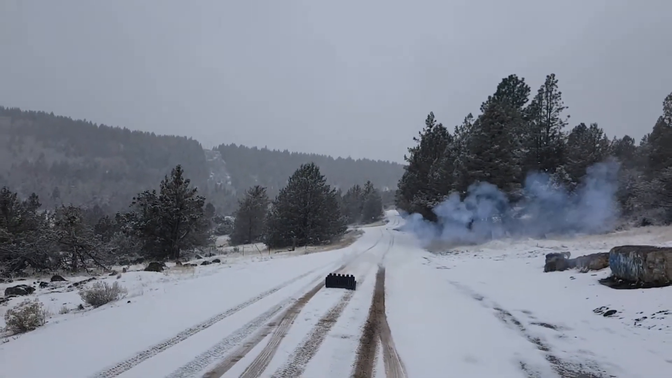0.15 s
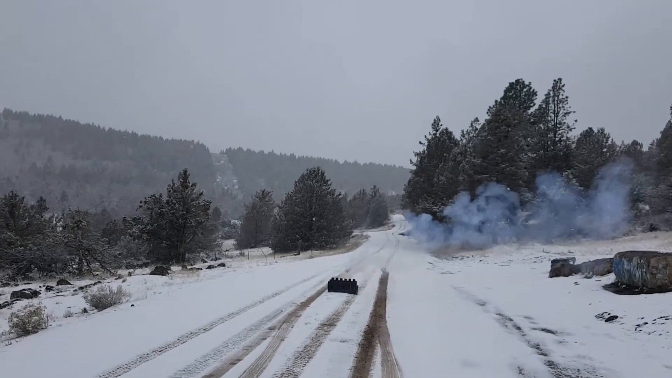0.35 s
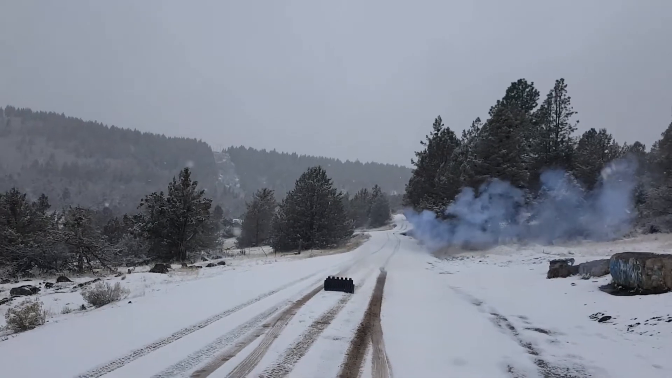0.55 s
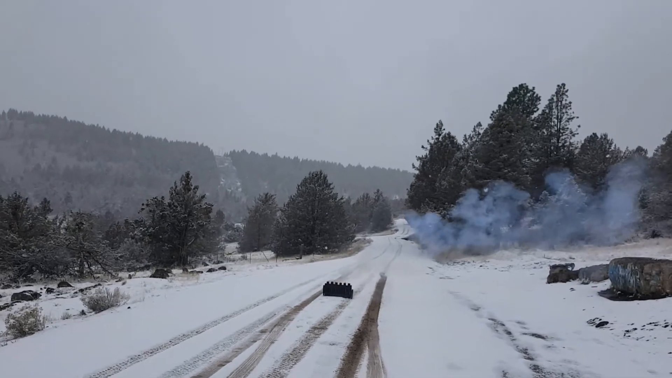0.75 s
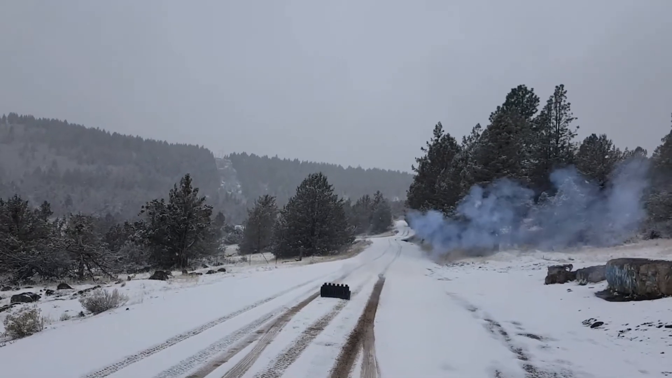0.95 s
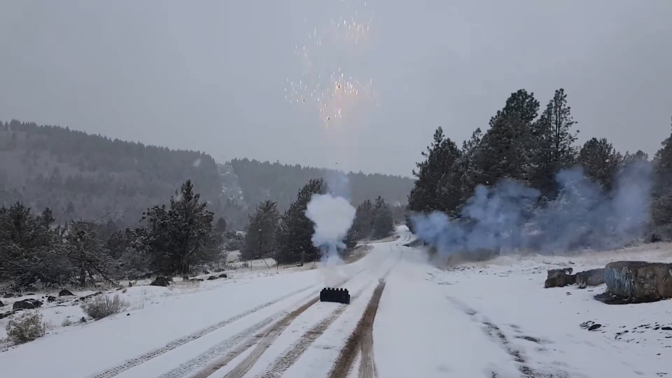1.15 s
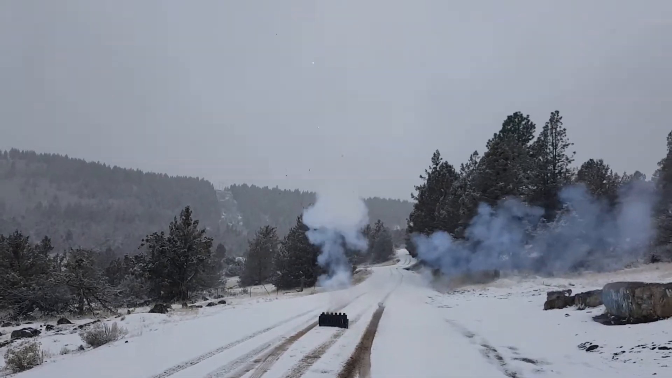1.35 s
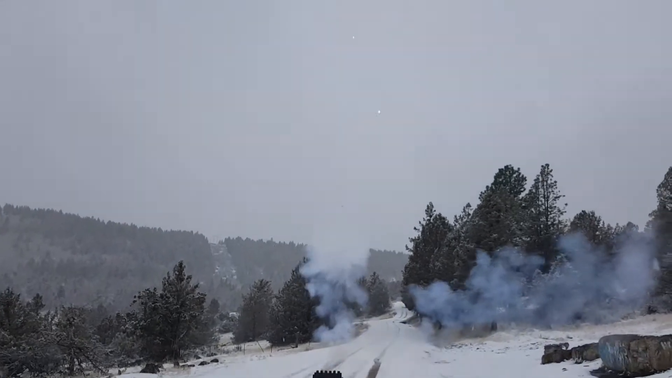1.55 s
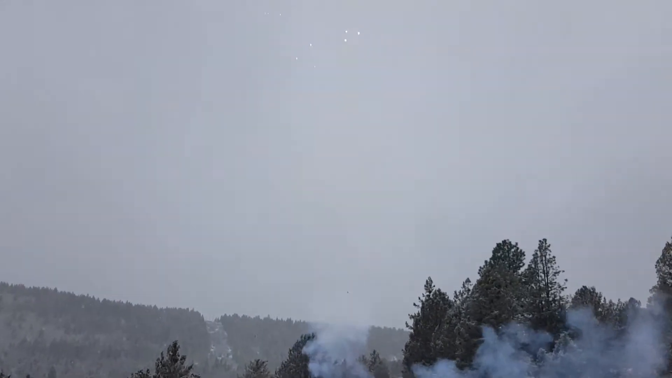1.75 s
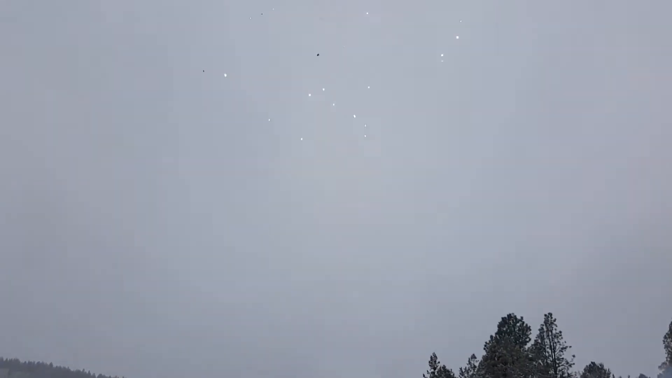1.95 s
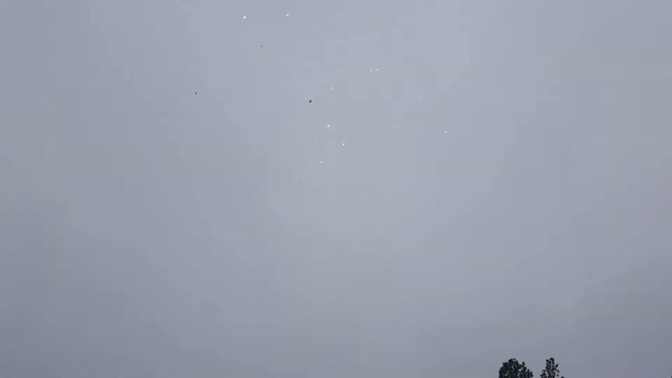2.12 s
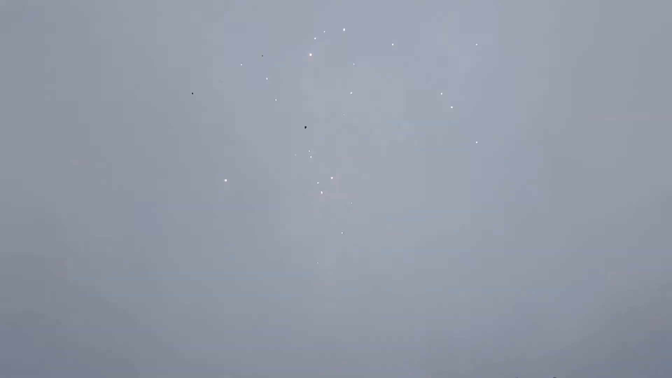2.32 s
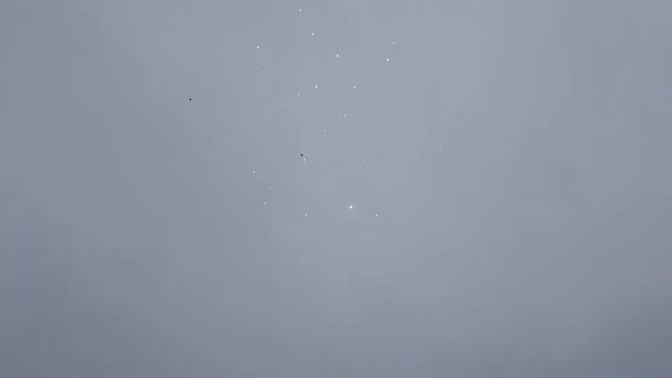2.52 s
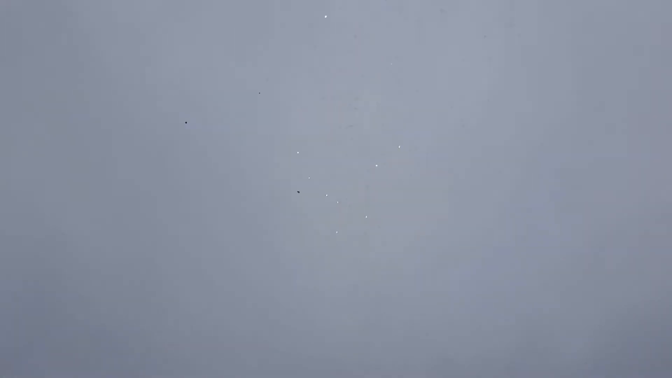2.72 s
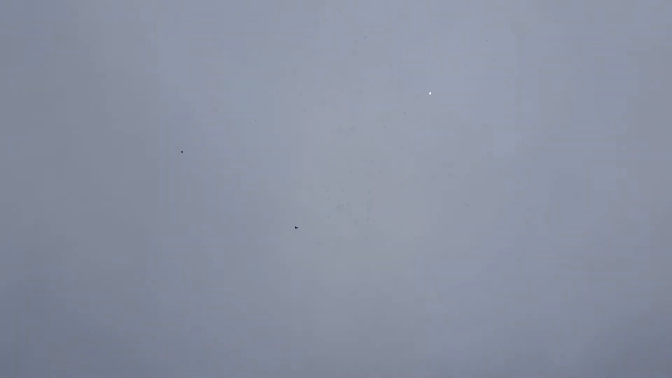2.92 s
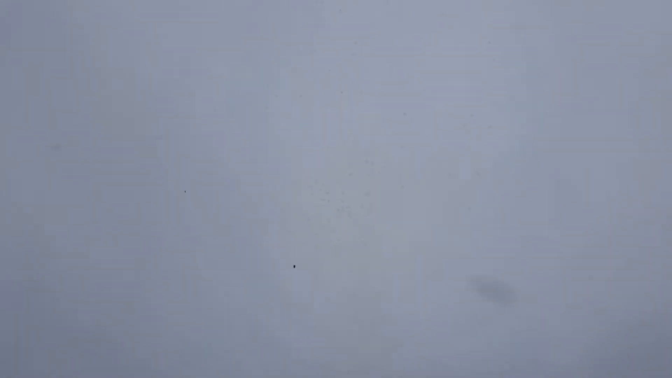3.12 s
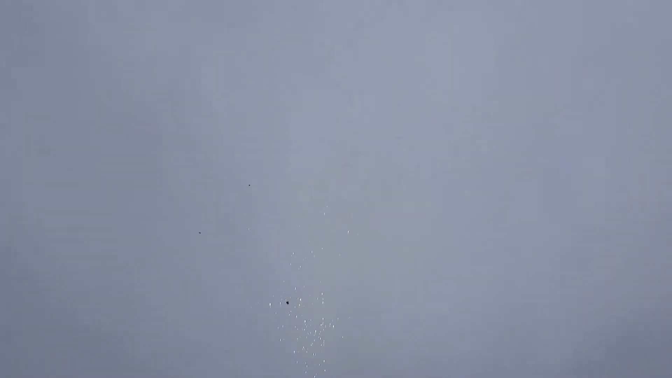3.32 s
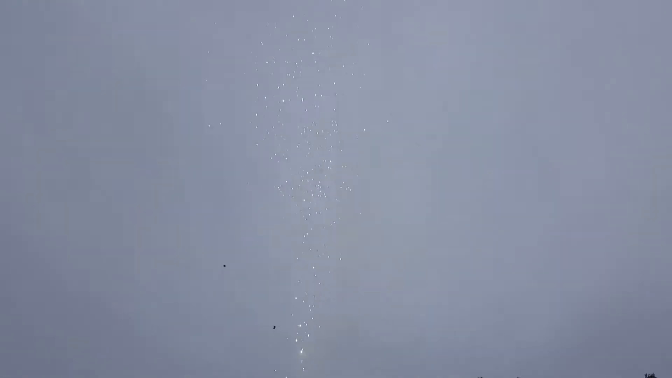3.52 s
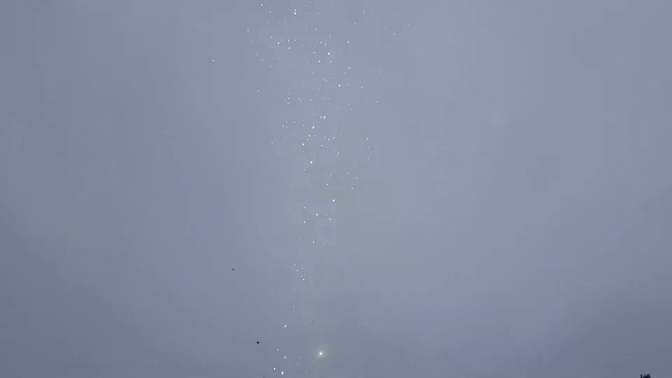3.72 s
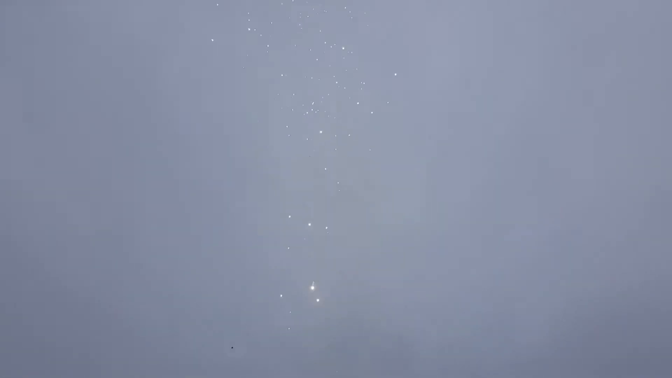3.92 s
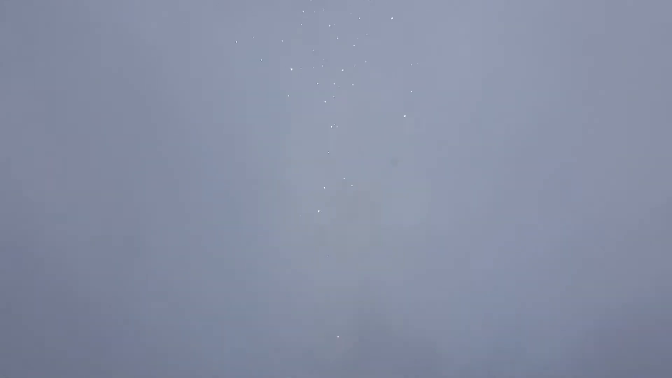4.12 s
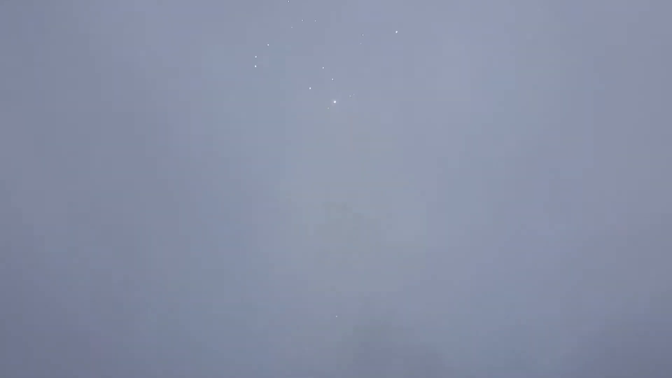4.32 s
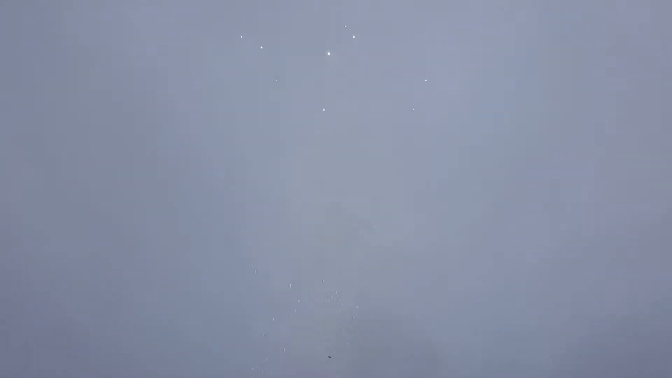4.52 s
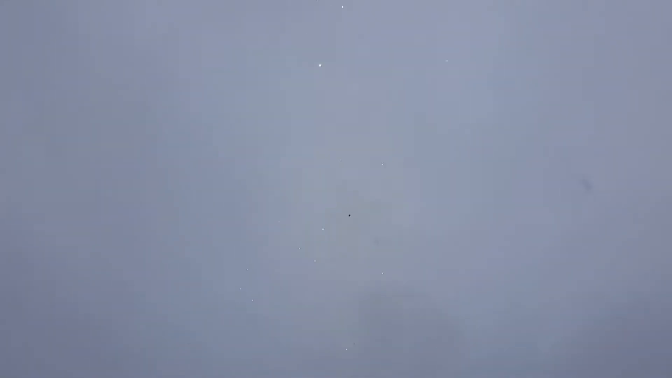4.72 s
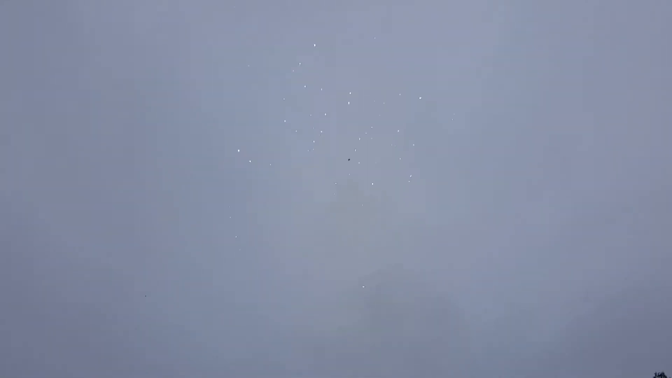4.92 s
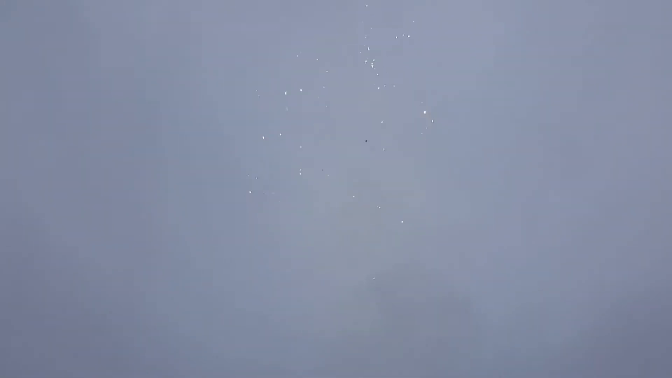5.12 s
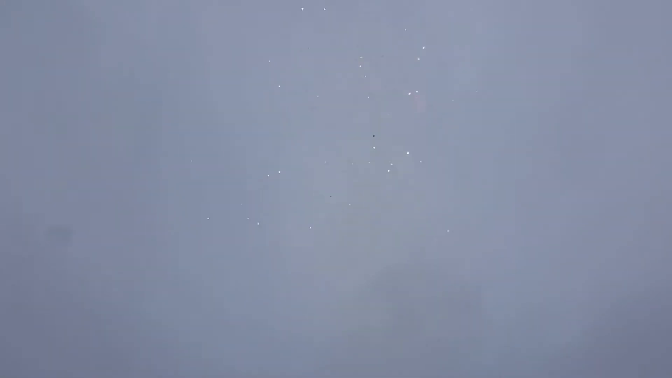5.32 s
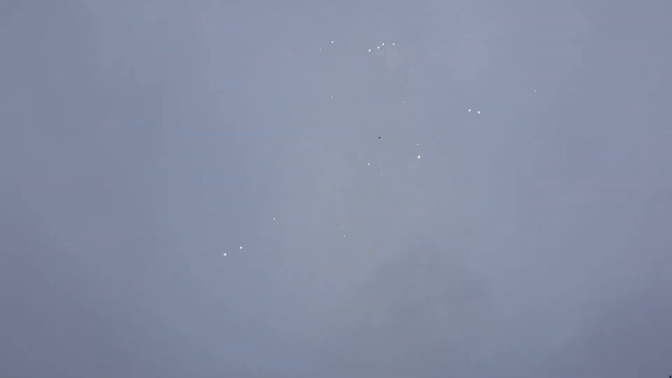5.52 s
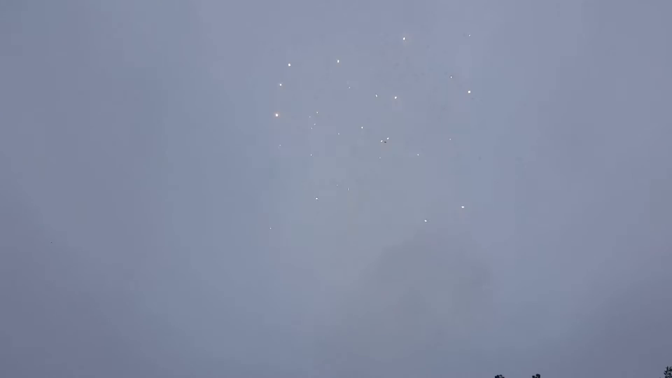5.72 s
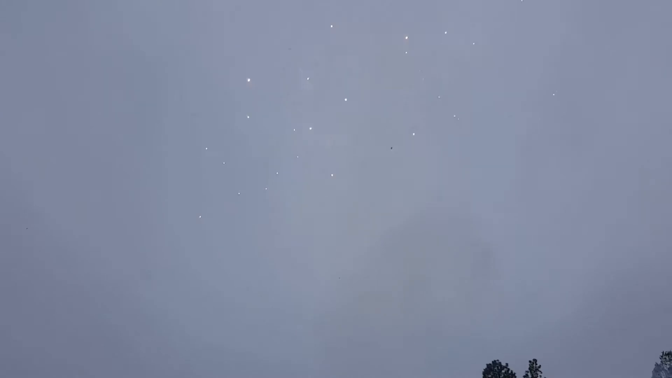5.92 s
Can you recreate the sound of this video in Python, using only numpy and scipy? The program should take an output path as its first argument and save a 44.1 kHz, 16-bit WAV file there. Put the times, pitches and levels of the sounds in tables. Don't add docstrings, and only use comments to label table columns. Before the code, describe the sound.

An open snowy road with trees and hills, in stereo. From 0 s, low uneven wind rumble and faint snow hiss, with tiny dull pops far off around 0.4, 0.5 and 0.8 s. At 1.15 s a firework rack fires: a tiny tick, a harsh clipped burst of gas and a short hollow low boom. Quick reflections, scattered slap echoes within half a second and a long dark valley roll follow; wind dips, then returns with gusts. Fine crackling, leaning left, runs from 1.4 to about 2.8 s, with soft glitter hiss from 2.1 s and muffled pop clusters near 2.2 and 3 s. At 3.28 s a second sharp, cracking launch has a weaker, brighter tail; glitter fizzes fuller from 3.5 s. At 4.48 s a third, slightly less blasting, thumpier shot echoes briefly. Its roll fades into wind and rising snow hiss until 6 s.

```python
import sys
import numpy as np
from scipy import signal
from scipy.fft import rfft, irfft, next_fast_len
from scipy.io import wavfile
from scipy.ndimage import uniform_filter1d

SR = 44100
rng = np.random.default_rng(int(sys.argv[2]) if len(sys.argv) > 2 else 0)


def to_wav(s):
    ch = np.atleast_2d(s).T
    pcm = np.round(np.clip(ch, -1, 1) * 32767)
    wavfile.write(sys.argv[1], SR, pcm.astype(np.int16))


def voltage_ratio(decibels):
    exponent = np.asarray(decibels, float) / 20
    return 10 ** exponent


N = 262836

# start_s, roll_db, roll_treble_db (extra), roll_stretch (factor)
SHOTS = [
    (1.151, 1.5, 0, 1),
    (3.281, -8.5, 10, 1.04),
    (4.477, -4.5, 7.5, .82),
]


def on_log(table, hz):
    f, v = np.transpose(table)
    return np.interp(np.log(np.maximum(hz, 1)), np.log(f), v)


def unit(x):
    return x / np.sqrt(np.mean(x ** 2))


def walk(rate):
    k = int(SR / rate)
    held = np.repeat(rng.standard_normal(N // k + 1), k)
    return unit(uniform_filter1d(uniform_filter1d(held, k), k)[:N])


def swell(length, rise, hold, t60):
    t = np.arange(length) / SR
    return np.minimum(t / max(rise, 1 / SR), 1) * voltage_ratio(-60 * np.maximum(t - rise - hold, 0) / t60)


def add(out, x, s):
    i = int(s * SR)
    out[:, i:i + x.shape[-1]] += x[..., :N - i]


def port_db(difference_db):
    return np.array([difference_db, -difference_db]).reshape(2, -1) / 2


def arrivals():
    # start_s, level_db, hold_s, t60_s
    igniter = [
        (1.1427, -21.5, .0015, .05),
        (3.278, -13, .0008, .006),
        (4.469, -19, .003, .037),
    ]
    rush = [
        (1.1465, -2.5, 0.00964, 0.0085),
        (3.282, -3, 0.0092, 0.0061),
        (4.4745, -11.5, 0.0084, 0.014),
    ]
    plume = [
        (1.159, -21, 0.0058, .12),
        (3.301, -17, 0.0056, 0.12),
        (4.487, -20, 0.014, .09),
    ]
    # start_s, level_db, t60_s, top_hz
    near = [(1.169, -21.5, 0.013, 4900), (1.185, -21.5, 0.0092, 2980), (1.21, -27.5, 0.033, 5050),
            (1.222, -25, .02, 8050), (1.238, -35, .03, 4000), (1.255, -31, 0.023, 4800),
            (3.307, -29.5, .025, 9000), (3.318, -22, .017, 3000), (3.328, -30.5, 0.1, 5000),
            (3.34, -35.5, 0.12, 4900), (4.496, -13.5, .015, 3000), (4.5115, -33, 0.021, 3000),
            (4.52, -29.5, 0.034, 5000), (4.533, -27.5, .05, 5000), (4.548, -36, 0.12, 6300)]
    found = []
    for rows, band_hz in ((igniter, (527, 3500)), (rush, (1400, 17900)), (plume, (1900, 11100))):
        found += [(*row, *band_hz) for row in rows]
    hold_s, bottom_hz = 0.0015, 1050
    return found + [(s, db, hold_s, t60, bottom_hz, top_hz) for s, db, t60, top_hz in near]


def gas(size, lag_s, pan_db, flutter_db, flutter_hz):
    # freq_hz, density_db (per Hz)
    gas_colour = [(210, -44), (350, 13), (1830, -2.5), (2180, -0.5), (3520, -6.5), (4060, -5), (5070, -7.5),
                  (5760, -8.5), (7670, -15), (11600, -15.5), (15700, -12.5)]
    # freq_hz, share
    apart_share = [(600, .95), (2000, .65), (5000, .35)]
    out = np.zeros((2, N))
    hz = np.fft.rfftfreq(size, 1 / SR) + 1
    apart, colour = on_log(apart_share, hz), voltage_ratio(on_log(gas_colour, hz))
    for s, db, hold, t60, bottom_hz, top_hz in arrivals():
        shared, left, right = rfft(rng.standard_normal((3, size)))
        late = np.exp(-2j * np.pi * hz * lag_s * rng.standard_normal())
        ports = np.array([shared + apart * left, shared * late + apart * right])
        band = colour / np.sqrt((1 + (hz / top_hz) ** 4) * (1 + (bottom_hz / hz) ** 4))
        puff = unit(irfft(ports * band)) * swell(size, .3 * hold, hold, t60)
        add(out, voltage_ratio(db) * puff, s)
    return out * voltage_ratio(flutter_db * walk(flutter_hz) + port_db(pan_db))


def booms(size, lag_s, detune):
    # start_s, pitch_hz, peak_db, hold_s, t60_s
    modes = [(1.1405, 1900, -9.5, 0.0004, 0.0044), (1.1615, 119.9, -4.5, 0.024, 0.024),
             (1.1498, 234.6, -4.5, 0.035, 0.032), (1.1593, 177, 0.5, 0.0049, 0.006),
             (1.193, 170.8, -16, 0.016, 0.22), (1.199, 215.6, -15, 0.022, 0.066),
             (1.15, 516, -11, 0.0047, 0.1), (3.2778, 1624, -1, 0.00031, 0.007),
             (3.282, 132, -2.5, 0.0038, 0.023), (3.3, 104, -9, 0.013, 0.029),
             (3.3095, 173, -13, 0.014, 0.067), (3.312, 283.5, -11, 0.0029, 0.075),
             (3.3155, 1400, -11, .004, 0.016), (3.284, 420, -9, 0.0086, .02),
             (3.349, 469, -27, 0.015, 0.05), (4.479, 144.6, -5, 0.013, 0.012),
             (4.4957, 119, -6, 0.012, 0.013), (4.496, 497, -10.5, 0.0015, 0.046),
             (4.5132, 1398, -4.5, 0.00092, 0.0036), (4.516, 192, -5, 0.0026, 0.033),
             (4.538, 169.7, -26, 0.009, 0.22), (4.549, 476, -19, 0.0016, 0.018)]
    out = np.zeros((2, N))
    for s, hz, db, hold, t60 in modes:
        late, off = rng.random((2, 2, 1))
        t = np.maximum(np.arange(size) / SR - lag_s * late, 0)
        side_db = on_log([(120, -0.7), (1500, 0.92)], hz) * np.array([[1], [-1]])
        tone = np.sin(2 * np.pi * hz * (1 + detune * (off - .5)) * t)
        add(out, voltage_ratio(db + side_db) * tone * swell(size, 0.28 / hz, hold, t60), s)
    return out


def pops(table, size, rise, wide, sag, share):
    out = np.zeros((2, N))
    f, t = np.fft.rfftfreq(size, 1 / SR), np.arange(size) / SR
    for s, db, hz, pan_db, t60 in table:
        side = port_db(pan_db)
        ring = np.sin(2 * np.pi * np.log1p(sag * 1.527 * hz * t) / sag + 0.11 * side)
        shared, own = rng.standard_normal(size), rng.standard_normal((2, size))
        ratio = f / hz
        band = ratio / (0.74 + ratio) / (1 + (ratio / wide) ** 4)
        fuzz = unit(irfft(rfft(shared + 1.15 * own) * band))
        bang = ((1 - share) * ring + 0.4 * share * fuzz) * swell(size, rise, 1 / hz, t60)
        add(out, voltage_ratio(db + side) * bang, s - rise)
    return out


def echoes():
    # delay_s, pitch_hz, left_minus_right_db, t60_s
    reflectors = [
        (0.157, 1460, 0, 0.075),
        (0.194, 1180, 3, 0.048),
        (.287, 1280, -1, 0.044),
        (.322, 870, 1, 0.027),
        (.36, 1050, -3, .035),
        (.435, 1060, 1, 0.037),
        (.762, 880, -1, 0.07),
    ]
    answer_db = [
        (-26, -23.5, -19.5, -23, -42, -34, -31.5),
        (-29.5, -30.5, -26.5, -32, -40, -38, -34),
        (-25, -26, -37, -27, -40, -38, -38.5),
    ]
    answers = []
    for shot, row in zip(SHOTS, answer_db):
        answers += [(shot[0] + lag, db, *rest) for (lag, *rest), db in zip(reflectors, row)]
    return pops(answers, size=4096, rise=.003, wide=1.5, sag=.3, share=.9)


def star_pops():
    # start_s, peak_db, pitch_hz, left_minus_right_db, t60_s
    far_pops = [(.387, -39, 990, -5, .018), (.418, -29.5, 1000, -4, 0.04), (.527, -31, 650, 1.5, 0.023),
                (.837, -31, 554, -4, .026), (1.981, -40, 790, -4, 0.012), (2.107, -34.5, 627, 1, 0.019),
                (2.148, -35, 596, 0, 0.029), (2.179, -45, 690, -5, .016), (2.204, -32, 540, -4, 0.034),
                (2.221, -35, 787, -3, .026), (2.897, -33, 624, -5, 0.012), (2.931, -28.5, 653, -5, .016),
                (2.952, -29.5, 652, 0, .022), (3.005, -36, 608, -2, 0.019), (3.08, -25, 654, -2, 0.0066),
                (3.115, -28, 567, -5.5, 0.011)]
    return pops(far_pops, size=4096, rise=.0015, wide=1.3, sag=.3, share=.42)


def star_slaps():
    # start_s, peak_db, pitch_hz, left_minus_right_db, t60_s
    bursts = [
        (1.682, -39.5, 972, 8.5, .038),
        (2.252, -39, 918, -3, 0.033),
        (2.287, -38, 1060, 6, 0.03),
        (2.492, -35.5, 980, 7, .036),
        (3.388, -36, 1330, -7, 0.031),
        (4.39, -39, 1310, 15, 0.039),
        (4.866, -36, 1440, 7, 0.027),
    ]
    return pops(bursts, size=4096, rise=.002, wide=1.3, sag=.05, share=.65)


def stars(per_s, scatter_db, pan_db, gain_db):
    # time_s, level_db
    burning = [
        (1.4, -79),
        (1.433, -43),
        (1.62, -46),
        (1.75, -58),
        (1.92, -52.5),
        (2.1, -54.5),
        (2.3, -58),
        (2.5, -52.5),
        (2.8, -57),
    ]
    # pitch_hz, width_hz, level_db
    cavities = [
        (1050, 202, 4),
        (2110, 390, -1.5),
    ]
    hz = np.fft.rfftfreq(N, 1 / SR)
    ticks = (rng.random((2, N)) < per_s / SR) * voltage_ratio(scatter_db * rng.exponential(size=(2, N)))
    response = sum(voltage_ratio(db) / (1 + 2j * (hz - f) / width) ** 2 for f, width, db in cavities)
    s, db = np.transpose(burning)
    level_db = np.interp(np.arange(N) / SR, s, db, left=-120, right=-120)
    crackle = unit(irfft(rfft(ticks + 0.34 * ticks[::-1]) * response, N))
    return crackle * voltage_ratio(gain_db + level_db + port_db(pan_db))


ROLL_SETS_IN_S = 0.046


def roll(since, t60):
    onset = np.clip(since / ROLL_SETS_IN_S, 0, 1) ** 6
    return onset * voltage_ratio(-120 * np.maximum(since, 0) / t60)


def strip_db(lo, hi):
    # freq_hz, level_db (in a strip)
    roll_colour = [(50, -27), (130, -18), (290, -19), (560, -41.5), (1500, -50), (4000, -46.5),
                   (6500, -54.5), (12000, -47)]
    # freq_hz, t60_s
    roll_t60 = [(50, .5), (130, 0.74), (290, .4), (560, 0.31), (1200, 1.94), (2300, 2), (5000, 1.09),
                (12000, 1.2)]
    # freq_hz, level_db
    valley_colour = [(50, -32), (130, -11.5), (290, -39), (1200, -13.5), (12000, -25)]
    # freq_hz, change_db
    duck_colour = [(130, -7), (290, -14.5), (560, -3.5), (2300, 1.5)]
    # start_s, level_db, burn_s
    glitter = [
        (2.1, -7.5, 1.1),
        (3.45, 0, 1.06),
    ]
    # freq_hz, level_db (in a strip)
    glitter_colour = [(300, -76.5), (600, -63), (1200, -55.5), (2300, -58.5), (4000, -63.5), (6500, -70.5),
                      (12000, -68.5)]
    # time_s, level_db
    snow = [(0, -64.5), (.25, -64.5), (.36, -70.5), (.47, -62), (.75, -61), (.95, -55.5), (1.12, -59.5),
            (1.5, -90.5), (1.9, -71), (2.4, -57), (2.88, -59.5), (3.03, -76.5), (3.3, -79), (3.55, -61),
            (3.9, -66.5), (4.35, -59.5), (5.0, -72), (5.96, -58.5)]
    # freq_hz, level_db (in a strip)
    snow_reach = [(1200, -15.5), (2300, -5), (4000, -5.5), (6500, -12), (12000, 0.5)]
    # freq_hz, level_db (in a strip)
    calm = [(50, -50), (130, -47), (290, -52), (560, -55.5), (1200, -62.5), (2300, -62), (4000, -73.5),
            (6500, -83.5)]
    # time_s, strength_db
    gusts = [(0, -0.5), (.15, -2), (.45, 4.5), (.78, -5.5), (1.1, -4), (1.65, 9.5), (2.05, -0.5),
             (2.3, -0.5), (2.8, 0), (3.2, 1), (3.6, -3), (4.05, 0), (4.4, -3), (5.02, 1.5), (5.16, -5.5),
             (5.27, 2.5), (5.42, -4), (5.96, 1)]
    # freq_hz, share
    gust_reach = [(50, 0.81), (130, 0.36), (290, 0.1), (1200, 0.13)]
    valley_s, slope_s, slope_gain_db = 0.321, 0.12, 5.5
    duck_hold_s, duck_release_s = 0.66, 0.37
    glitter_rise_s, glitter_t60_s = .15, 1.1

    t, hz = np.arange(0, N, 64) / SR, np.sqrt(lo * hi)
    duck, power = 0, 0
    far_db = on_log(valley_colour, hz)
    for s, db, treble_db, stretch in SHOTS:
        since = t - s
        t60 = stretch * on_log(roll_t60, hz)
        back = np.clip((since - duck_hold_s) / duck_release_s, 0, 1)
        duck = np.maximum(duck, (t > s) * (1 - back))
        start_db = db + on_log(roll_colour, hz) + treble_db * on_log([(300, 0), (1500, 1)], hz)
        valley = voltage_ratio(2 * far_db) * roll(since - valley_s + ROLL_SETS_IN_S, t60)
        slope = voltage_ratio(2 * (far_db + slope_gain_db)) * roll(since - slope_s + ROLL_SETS_IN_S, t60 / 2)
        power = power + voltage_ratio(2 * start_db) * (roll(since, t60) + valley + slope)
    for s, db, burn in glitter:
        fall = voltage_ratio(-60 * np.maximum(t - s - burn, 0) / glitter_t60_s)
        shape = np.clip((t - s) / glitter_rise_s, 0, 1) * fall
        power = power + (voltage_ratio(db + on_log(glitter_colour, hz)) * shape) ** 2
    snow_db = np.interp(t, *np.transpose(snow)) + on_log(snow_reach, hz)
    gust_db = np.interp(t, *np.transpose(gusts)) * on_log(gust_reach, hz)
    wind_db = on_log(calm, hz) + duck * on_log(duck_colour, hz) + gust_db
    power = power + voltage_ratio(2 * snow_db) + voltage_ratio(2 * wind_db)
    return np.interp(np.arange(N) / SR, t, 10 * np.log10(power))


def air_band(lo, hi, flicker_db, rate, count):
    # freq_hz, density_db (per Hz)
    air_colour = [(20, -28.5), (66, -1), (155, 0.5), (250, -3.5), (500, -17.5), (900, -20.5), (1500, -18.5),
                  (2250, -18.5), (3500, -27), (5200, -35.5), (7400, -35.5), (9200, -37), (12000, -34.5),
                  (16000, -36.5)]
    # freq_hz, likeness
    likeness = [(40, 0.51), (130, 1), (300, 0.86), (700, 0.4), (1400, 0.203), (3000, 0.12), (7000, .1),
                (15000, 0.089)]
    size = next_fast_len(N)
    hz = np.fft.rfftfreq(size, 1 / SR)
    out, gust = 0, walk(rate / 2)
    place = count * np.log(np.maximum(hz, 1) / lo) / np.log(hi / lo) - .5
    like = np.clip(on_log(likeness, hz), 0, 1)
    a, b = rfft(rng.standard_normal((2, size))) * voltage_ratio(on_log(air_colour, hz))
    mid, side = a * np.sqrt(1 + like), b * np.sqrt(1 - like)
    for k in range(count):
        share = np.cos(np.pi / 2 * np.clip(place - k, -1, 1))
        strip = irfft(np.array([mid + side, mid - side]) * share, size)[:, :N]
        out = out + strip * voltage_ratio(flicker_db * (1.48 * gust + 1.6 * walk(rate)))
    return out / np.sqrt(np.mean(out.mean(0) ** 2)) * voltage_ratio(strip_db(lo, hi))


def air():
    hiss_pan_db, pan_back_s = 4, 0.212
    t = np.arange(N) / SR
    lows = air_band(15, 77, 0.96, 12, count=2)
    lows = lows + air_band(79, 195, 1.0, 16, count=2)
    lows = lows + air_band(186, 419, 1.58, 21.93, count=2)
    lows = lows + air_band(362, 860, 0.93, 25, count=2)
    highs = air_band(730, 1800, 1.0, 30.04, count=2)
    highs = highs + air_band(1700, 3100, 0.64, 40, count=2)
    highs = highs + air_band(3000, 5300, 0.99, 27, count=2)
    highs = highs + air_band(5100, 8300, 0.39, 25, count=2)
    highs = highs + air_band(8300, 15000, 0.71, 30.18, count=4)
    centred = sum((t > s) * np.exp(-np.abs(t - s) / pan_back_s) for s, *_ in SHOTS)
    return lows * voltage_ratio(port_db(-.8)) + highs * voltage_ratio(port_db(hiss_pan_db * (1 - centred)))


def scene():
    shots = gas(size=16384, lag_s=.00006, pan_db=2.5, flutter_db=3.2, flutter_hz=300)
    shots = shots + booms(size=16384, lag_s=.0009, detune=.05)
    sky = star_pops() + star_slaps()
    sky = sky + stars(per_s=210, scatter_db=1.8, pan_db=4.5, gain_db=-2.5)
    return shots + sky + echoes() + air()


def top_cut(x):
    return signal.sosfilt(signal.butter(12, 15840, fs=SR, output="sos"), x)


def record(dry):
    self_noise_db, top_hz, full_scale = -72, 15800, .995
    hiss = voltage_ratio(self_noise_db) * unit(np.diff(rng.standard_normal((2, N + 1))))
    low_pass = signal.ellip(8, .2, 70, top_hz, fs=SR, output="sos")
    cut = signal.sosfilt(low_pass, dry + hiss)
    return top_cut(np.clip(cut, -full_scale, full_scale))


dry = scene()
out = record(dry)
to_wav(out)
```